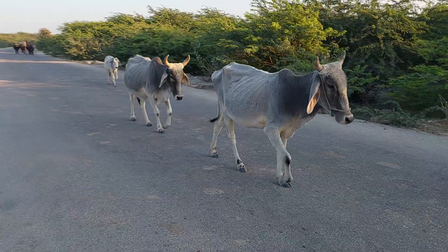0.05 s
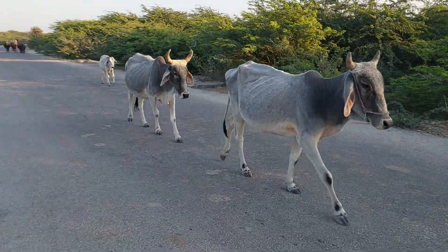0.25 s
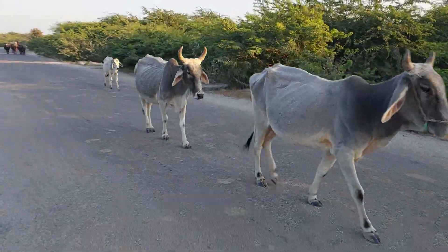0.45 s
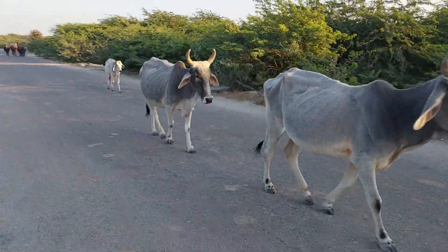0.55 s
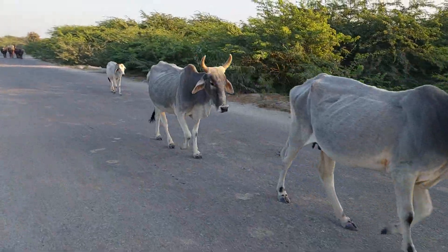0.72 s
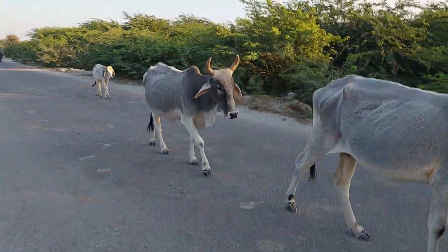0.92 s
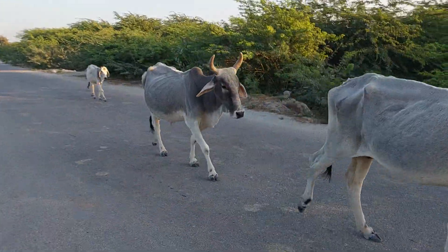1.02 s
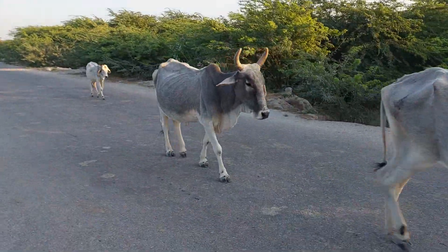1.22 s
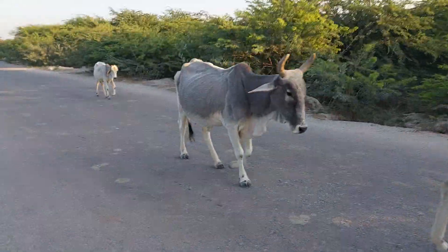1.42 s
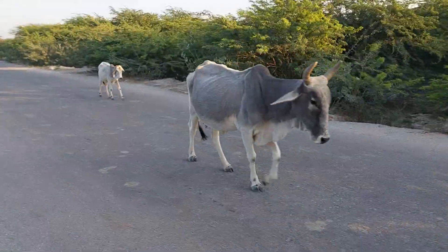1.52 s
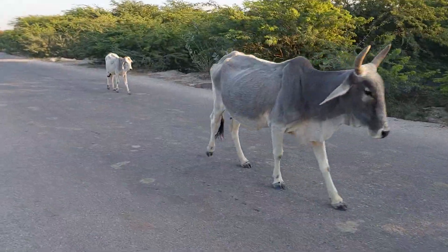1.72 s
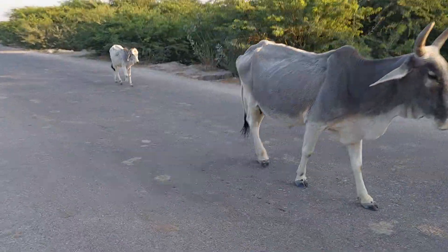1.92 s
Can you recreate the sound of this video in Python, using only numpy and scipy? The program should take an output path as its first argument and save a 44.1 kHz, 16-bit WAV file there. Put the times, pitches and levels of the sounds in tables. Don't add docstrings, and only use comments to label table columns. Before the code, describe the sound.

Close hand-held stereo of cattle walking on a paved road: dry hoof clicks and grit scrapes, clear at left, with loud finger rubbing and pops at right until the later part, faint bird whistles and low hum behind.

```python
import sys
import numpy as np
from scipy import signal
from scipy.io import wavfile
from scipy.ndimage import uniform_filter1d

SR = 44100
rng = np.random.default_rng(int(sys.argv[2]) if len(sys.argv) > 2 else 0)


def to_wav(s):
    ch = np.atleast_2d(s).T
    pcm = np.round(np.clip(ch, -1, 1) * 32767)
    wavfile.write(sys.argv[1], SR, pcm.astype(np.int16))


def gain_from_db(level_db):
    decades = np.asarray(level_db, float) / 20
    return 10 ** decades


N = 85995
LOWS_END_S = 1.432


def evened(x):
    return x / np.sqrt(np.mean(x ** 2) + 1e-20)


def colour(x, points):
    f, db = np.transpose(points)
    bins_hz = abs(np.fft.fftfreq(8192, 1 / SR))
    log_gain = np.interp(np.log(bins_hz + 1), np.log(f + 1), db) * np.log(10) / 20
    taps = np.fft.ifft(np.exp(np.conj(signal.hilbert(log_gain)))).real[:4096]
    return signal.oaconvolve(x, taps)[:len(x)]


def hump(hz, octaves, skirt_db=-13):
    near, far = 2 ** (octaves / 2), 2 ** (3 * octaves)
    return [(hz / far, 3 * skirt_db), (hz / near, -3), (hz, 0), (hz * near, -3), (hz * far, 3 * skirt_db)]


def add(mix, s, sound):
    part = mix[round(s * SR):][:len(sound)]
    part += sound[:len(part)]


def grains(per_s, spread_db):
    sizes = gain_from_db(spread_db * np.minimum(rng.exponential(1, N), 4))
    return evened(rng.standard_normal(N) * sizes * (rng.random(N) < per_s / SR))


def gate(length, rise, fall):
    t = np.arange(0, length + fall, 1 / SR)
    return t, np.clip(np.minimum(t / rise, (length + fall - t) / (2 * fall)), 0, 1)


def filtered(x, order, hz, kind):
    return signal.sosfilt(signal.butter(order, hz, kind, fs=SR, output="sos"), x)


def filtered_in_phase(x, order, hz, kind):
    return signal.sosfiltfilt(signal.butter(order, hz, kind, fs=SR, output="sos"), x)


# start_s [s], level_db [dB], pitch_hz [Hz]
CLICKS = [(.1593, -58, 5000), (.2682, -49, 4500), (.3645, -50, 900), (.372, -45, 1670), (.3967, -37, 2020),
          (.4852, -42, 1100), (.493, -43, 1500), (.4949, -42, 1300), (.4978, -41, 1200), (.5215, -43, 6500),
          (.5703, -41, 6500), (.5704, -45, 1800), (.5839, -45, 5500), (.8026, -42, 900), (1.0295, -42, 700),
          (1.1445, -46, 1100), (1.1688, -33, 2100), (1.3495, -46, 1470), (1.3584, -46, 3300),
          (1.3645, -36, 3230), (1.3662, -36, 3500), (1.3689, -38, 3040), (1.3733, -38, 2600),
          (1.377, -35, 4000), (1.3798, -34, 3500), (1.3955, -25, 5100), (1.4129, -29, 4600),
          (1.5383, -43, 3300), (1.5428, -40, 1950), (1.6763, -45, 450), (1.8152, -42, 1900),
          (1.8217, -44, 2400), (1.8253, -47, 900), (1.8294, -49, 2700), (1.8405, -37, 3200),
          (1.8408, -45, 900), (1.8434, -40, 5000), (1.8589, -40, 3600), (1.9277, -46, 1200),
          (1.9471, -39, 2800)]


def hoof_clicks():
    out, t = np.zeros(N), np.arange(400) / SR
    for start_s, level_db, pitch_hz in CLICKS:
        ring = np.sin(2 * np.pi * pitch_hz * t) * np.exp(-t * pitch_hz / .65)
        crack = .18 * rng.standard_normal(400) * np.exp(-t / .0012)
        blow = colour(ring + crack, hump(pitch_hz, 1.8))
        add(out, start_s, gain_from_db(level_db + 6) * blow / abs(blow).max())
    return out


def grit():
    out, u = np.zeros(N), np.arange(-44, 45) / SR
    for hz in np.geomspace(450, 13000, 12):
        grain = np.sqrt(hz) * np.exp(-(u * hz / 0.75) ** 2) * np.cos(2 * np.pi * hz * u)
        out += signal.oaconvolve(grains(16000 / 8, 2.2), grain, "same")
    return out


# start_s [s], length_s [s], level_db [dB]
SCUFFS = [(.066, .034, -63), (.274, .04, -64), (.362, .075, -56), (.435, .05, -62), (.48, .09, -57.5),
          (.7, .12, -57), (1.011, 0.2, -62), (1.35, .08, -52.5), (1.363, .022, -45), (1.561, 0.051, -59.5),
          (1.662, 0.03, -56.5), (1.812, .03, -58), (1.84, .022, -53), (1.86, .1, -62)]


def hoof_scuffs():
    out, stones = np.zeros(N), grit()
    soft_hz, hz_per_db = 1500, 55
    for start_s, length_s, level_db in SCUFFS:
        pitch_hz = soft_hz + hz_per_db * max(level_db + 68, 0)
        u, shape = gate(length_s, .004, .008)
        stretch = stones[round(start_s * SR):][:len(u)]
        drag = evened(colour(stretch, hump(pitch_hz, 2.6, skirt_db=-27)))
        add(out, start_s, gain_from_db(level_db) * shape[:len(drag)] * drag)
    return out


def hooves():
    direct, t = hoof_clicks() + hoof_scuffs(), np.arange(4410) / SR
    t60_s, return_db = .08, -12
    tail = rng.standard_normal(len(t)) * gain_from_db(-60 * t / t60_s) * np.minimum(t / 0.00067, 1)
    return direct + gain_from_db(return_db) * signal.oaconvolve(direct, tail / np.linalg.norm(tail))[:N]


# time_s [s], level_db [dB]
PRESSURE = [(.06, -37.5), (.31, -38.5), (.4, -35), (.56, -40), (.76, -29.5), (.84, -36), (1.0, -37),
            (1.2, -44), (1.428, -40), (1.434, -45), (1.46, -36.5), (1.7, -40.5), (1.74, -92)]


def pressure():
    return gain_from_db(np.interp(np.arange(N) / SR, *np.transpose(PRESSURE)))


# freq_hz [Hz], level_db [dB per Hz]
RUB = [(35, -24.5), (60, 4.5), (862, -2.5), (2300, -8), (3580, -10), (4220, -9), (7400, -31),
       (11500, -16.5), (16000, -28)]


def skin_friction():
    skin = colour(grains(11000, 2.2), RUB)
    skin /= filtered(skin, 2, 1000, "high").std()
    body = filtered_in_phase(skin, 2, 450, "low")
    ease_s, body_db = 1.22, 2
    grip = np.clip((ease_s - np.arange(N) / SR) * 20, 0, 1)
    return skin - body + body * (gain_from_db(-3.5) + grip * gain_from_db(body_db))


# start_s [s], length_s [s], level_db [dB], bright_db [dB]
RUBS = [(.066, .04, -49, -8), (.069, .012, -50, -30), (0.147, 0.13, -55, -34.5), (.17, .075, -48, -3),
        (0.332, 0.054, -49, -13), (0.393, .036, -38.5, -0.5), (0.43, 0.037, -43.5, 5),
        (0.489, 0.018, -49.5, -39), (.184, .024, -57, -25), (0.581, 0.025, -40, -5),
        (0.607, 0.041, -38, 0.5), (0.688, 0.086, -59.5, -6.5), (0.943, .02, -44.5, -12),
        (1.245, .018, -48, -6), (1.278, 0.079, -58.5, 3), (1.495, 0.012, -53.5, 11), (1.9, 0.059, -60, -8)]
# start_s [s], length_s [s], level_db [dB], change_db [dB], bright_db [dB]
SLIPS = [(.516, .011, -40, -5.5, 5), (.746, .02, -36, -15, 0), (.776, 0.038, -24, -22, 4.5),
         (.853, .03, -39, -4, 0), (.931, 0.0089, -46, 0, 0), (.968, 0.025, -43.5, 4.5, 6),
         (1.016, 0.025, -53, 5, -1), (1.139, 0.017, -32.5, -17.5, 1.5), (1.305, .005, -36, 0, -5),
         (1.309, .03, -33, -17, 0), (1.702, .033, -40.5, -7, 0.5), (1.764, .025, -39, -11, -0.5)]


def strokes(press):
    skin = skin_friction()
    top = filtered_in_phase(skin, 4, 6500, "high")
    sing = signal.lfilter(*signal.iirpeak(2200, 7, SR), skin)
    hiss_db, squeak_db = -19, -3
    low, high, dull = press * gain_from_db(hiss_db), press * gain_from_db(hiss_db - 4.5), np.zeros(N)
    steady_rubs = [(*row[:3], 0, row[3]) for row in RUBS]
    for table, rise, fall in ((steady_rubs, .007, .005), (SLIPS, .0008, .0015)):
        for start_s, length_s, level_db, change_db, bright_db in table:
            u, shape = gate(length_s, rise, fall)
            shape = shape * gain_from_db(level_db + change_db * u / length_s)
            add(low, start_s, shape)
            add(high, start_s, shape * gain_from_db(bright_db))
            add(dull, start_s, shape * gain_from_db(squeak_db - 0.52 * bright_db))
    lumps = evened(uniform_filter1d(uniform_filter1d(rng.standard_normal(N), 150), 150))
    return gain_from_db(2.2 * lumps) * (low * (skin - top) + high * top + dull * sing)


def rush(press):
    lasting = np.clip((LOWS_END_S - np.arange(N) / SR) / 0.0024, 0, 1)
    noise = filtered(rng.standard_normal(N), 2, [35, 102.4], "band")
    return evened(noise) * press * gain_from_db(-3.5) * lasting


# centre_s [s], push [-1..1], period_s [s]
THUMPS = [(0.2118, 0.075, 0.0052), (0.391, .07, 0.014), (.407, 0.12, 0.015), (.5233, 0.17, 0.012),
          (0.5372, 0.067, 0.024), (0.6231, 0.14, .012), (.638, 0.077, 0.015), (0.7384, -.1, 0.005),
          (0.7475, 0.26, 0.0065), (.761, .08, .026), (.7757, .66, .0025), (.7776, -.2, .003),
          (.7362, .07, .004), (.8235, .05, .02), (.7826, .22, .009), (1.0292, 0.063, 0.01),
          (1.0914, -.1, 0.0034), (1.1402, .12, .005), (1.1445, .07, .006), (1.295, -.03, .012),
          (1.678, -.025, .005), (.8565, -.05, .003), (1.1487, -0.11, 0.0066)]


def thumps():
    out = np.zeros(N)
    for centre_s, push, period_s in THUMPS:
        u = np.arange(-1.5 * period_s, 1.5 * period_s, 1 / SR) / period_s
        add(out, centre_s - 1.51 * period_s, push * np.exp(-(u / 0.42) ** 2) * np.cos(2 * np.pi * u))
    return out


# peak_s [s], push [full scale], rise_s [s], fall_s [s]
POPS = [
    (.967, 1.17, 0.00011, 0.000075),
    (0.9682, 0.19, .0001, 0.000067),
    (1.138, 1.21, 0.0001, 0.00023),
    (1.1379, 0.38, 0.00017, .0009),
]


def pops():
    out, u = np.zeros(N), np.arange(-300, 300) / SR
    for peak_s, push, rise_s, fall_s in POPS:
        exponent = np.where(u < 0, (u / rise_s) ** 2, (abs(u) / fall_s) ** 0.6)
        add(out, peak_s - 300 / SR, push * np.exp(-exponent))
    size = round(.002 * SR)
    return out - uniform_filter1d(uniform_filter1d(out, size), size)


# time_s [s], level_db [dB], bright_db [dB]
TICKS = [(.0566, -12, -5), (.2234, -6, -9), (.259, -11, -9), (.3393, -8, -5), (.5105, 4, 0), (.5176, 1, 0),
         (.5211, -3, 0), (.5254, -3, 0), (.6263, 0, 0), (.7368, -3, 0), (.745, -5, 14), (.7834, 6, 3),
         (.7992, 5, -9), (.8034, 0, 3), (.932, 6, 0), (.9349, 6, 0), (.9372, 5, 3), (.94, -2, -6),
         (.9558, 6, 9), (1.0223, -4, -6), (1.0266, 9, 0), (1.0291, 3, 0), (1.038, 1, -3), (1.0896, -8, -6),
         (1.1219, -14, 0), (1.2488, -12, -3), (1.3073, 1, 0), (1.3103, 7, -3), (1.4937, -19, 6),
         (1.5071, -13, 0), (1.552, -14, 3), (1.6028, -20, 9), (1.6109, -19, 3), (1.6266, -17, 5),
         (1.6397, -4, -6), (1.697, -10, -2), (1.703, -6, -3), (1.7678, -9, -3), (1.9279, -13, -12),
         (.776, -1, -9), (1.5003, -22, 10), (.4535, -4, 0), (.6198, -2, 0), (1.2564, -11, -3)]


def ticks():
    low, high = np.zeros((2, N))
    for time_s, level_db, bright_db in TICKS:
        low[round(time_s * SR)] -= gain_from_db(level_db)
        high[round(time_s * SR)] -= gain_from_db(level_db + bright_db)
    low = colour(low, [(300, -15), (1500, -8.5), (4000, -8), (7500, -31), (16000, -60)])
    high = colour(high, [(4000, -50), (7500, -31), (11500, -19), (16000, -30)])
    return gain_from_db(1.5) * (low + high)


def finger():
    press = pressure()
    return strokes(press) + rush(press) + thumps() + pops() + ticks()


# start_s [s], length_s [s], level_db [dB]
NOTES = [
    (.083, .07, -57),
    (.298, .06, -54),
    (.52, .06, -53),
    (.72, .065, -57),
    (1.07, .065, -58),
    (1.225, .065, -57),
    (1.893, .035, -59),
]


def bird():
    out = np.zeros(N)
    pitch_hz, sag_hz, sag_db = 1092, 22, -9
    for start_s, length_s, level_db in NOTES:
        t, shape = gate(length_s, 0.0014, 0.0035)
        whistle = np.sin(2 * np.pi * (pitch_hz - sag_hz * t / (2 * length_s)) * t)
        add(out, start_s, np.sqrt(2) * gain_from_db(level_db + sag_db * t / length_s) * shape * whistle)
    return out


# freq_hz [Hz], width_hz [Hz], level_db [dB]
DRONE = [(47, 7, -46), (90, 18, -54), (139, 10, -59)]


def drone():
    out, t = np.zeros(N), np.arange(N) / SR
    for freq_hz, width_hz, level_db in DRONE:
        r = np.exp(-np.pi * width_hz / SR)
        noise = rng.standard_normal(N) + 1j * rng.standard_normal(N)
        slow = signal.lfilter([1], [1, -2 * r, r * r], noise)
        slow = slow / evened(abs(slow)) ** .5
        out += gain_from_db(level_db) * evened((slow * np.exp(2j * np.pi * freq_hz * t)).real)
    return out


# freq_hz [Hz], level_db [dB per Hz]
AIR = [(30, 11.5), (120, 1), (300, -4), (900, -11.5), (1700, -22.5), (2600, -25), (7000, -30), (15000, -38)]


def air(level_db):
    return gain_from_db(level_db) * evened(colour(rng.standard_normal(N), AIR))


# freq_hz [Hz], gain_db [dB]
PORT = [(100, -8), (500, 2), (2500, 5), (4500, 2), (7000, -14), (9000, -8), (12000, 0), (16000, -3)]
# time_s [s], level_db [dB]
SWELL = [(.12, 3), (.17, -5), (.34, -4), (.92, 2), (1.2, 0), (1.31, -7), (1.36, 2)]


def scene():
    t = np.arange(N) / SR
    swell = gain_from_db(np.interp(t, *np.transpose(SWELL)))
    road, song, hum = hooves(), bird(), swell * drone()
    left = road + song + hum + swell * air(-54)
    far_road = np.roll(colour(road, PORT), round(.0006 * SR))
    hum_share = np.where(t < LOWS_END_S, 1.2, .07)
    right = far_road + finger() - gain_from_db(10) * song + hum_share * hum + colour(air(-53), PORT)
    return np.array([left, right])


def top_cut(x):
    return signal.sosfilt(signal.butter(12, 17000, fs=SR, output="sos"), x)


def record(dry):
    t = np.arange(N) / SR
    duck_db, duck_share, recover_db_s = -24.5, 0.39, 262
    power_db = 10 * np.log10(abs(uniform_filter1d(dry[1] ** 2, 100)) + 1e-12)
    peak_db = np.maximum.accumulate(power_db + recover_db_s * t) - recover_db_s * t
    over_db = np.maximum(peak_db - duck_db, 0)
    duck = np.array([gain_from_db(-duck_share * uniform_filter1d(over_db, 100)), np.ones(N)])
    dry = signal.oaconvolve(dry, signal.firwin(127, 16100, fs=SR)[None], "same")
    opening = np.clip((t - .056) / 0.00033, 0, 1)
    return top_cut(np.clip(dry * duck * opening, -.99, .99))


dry = scene()
out = record(dry)
to_wav(out)
```